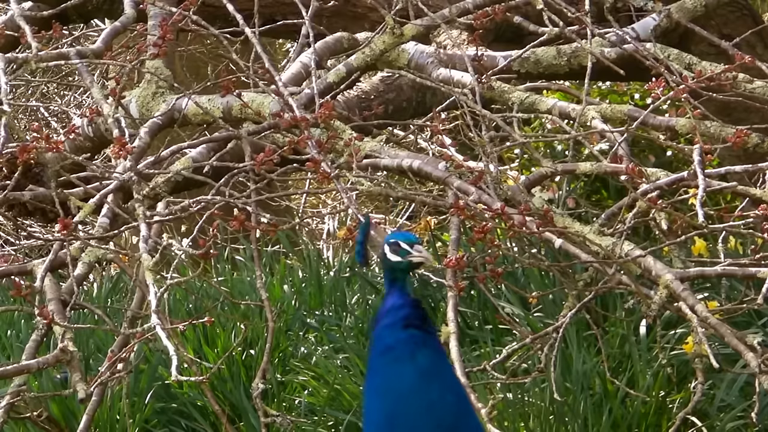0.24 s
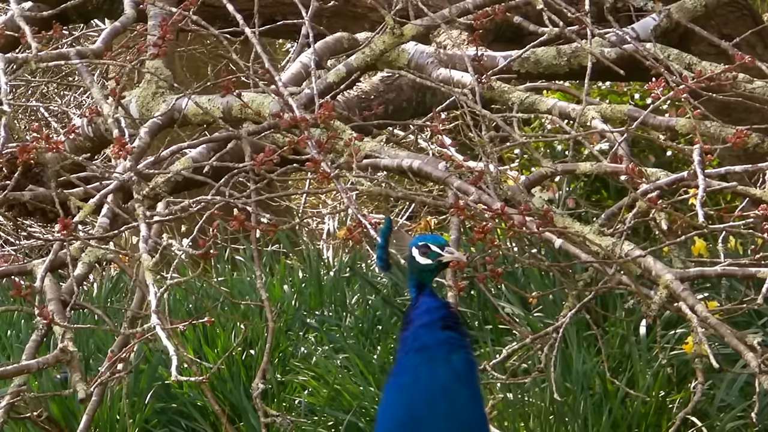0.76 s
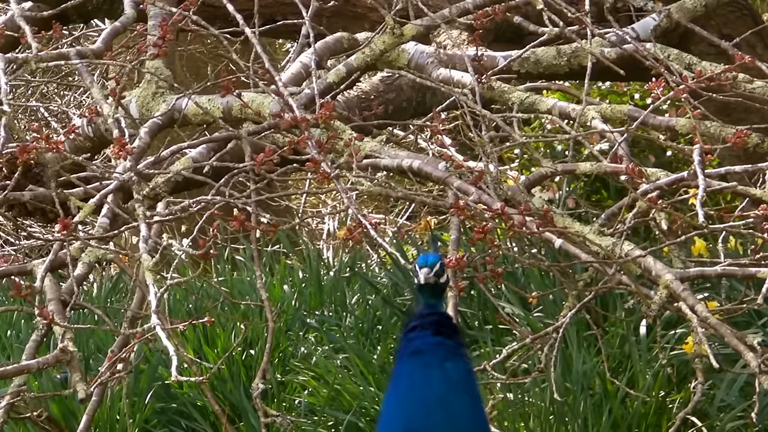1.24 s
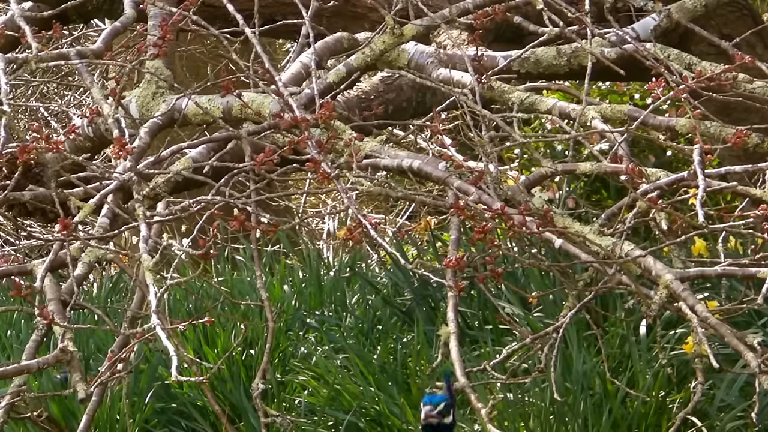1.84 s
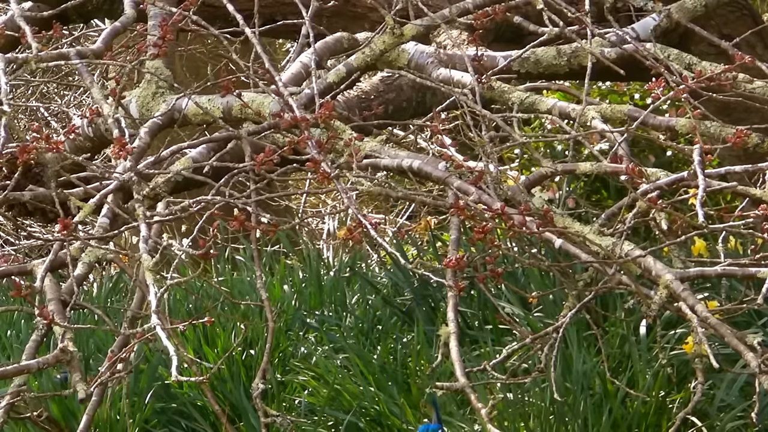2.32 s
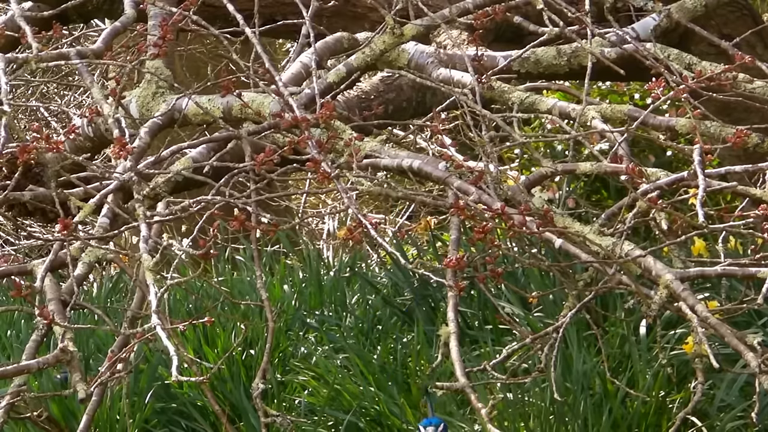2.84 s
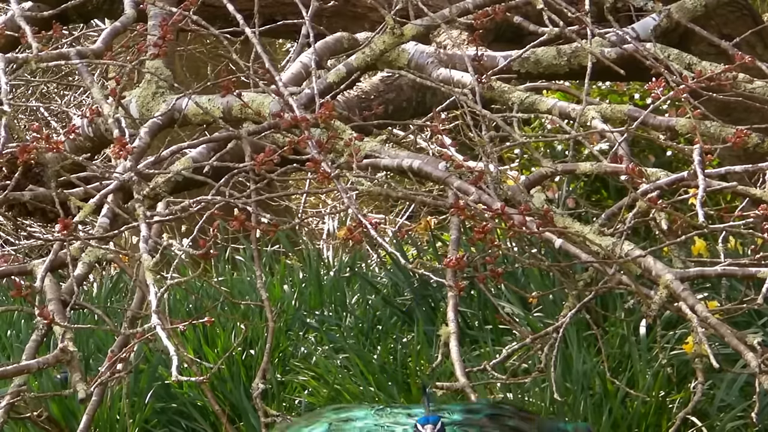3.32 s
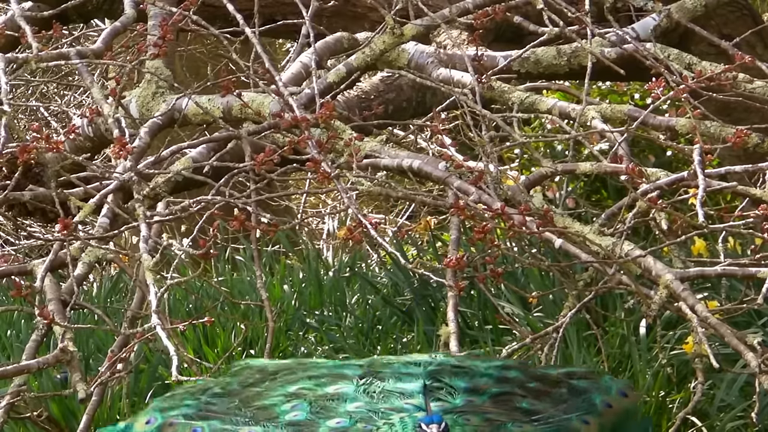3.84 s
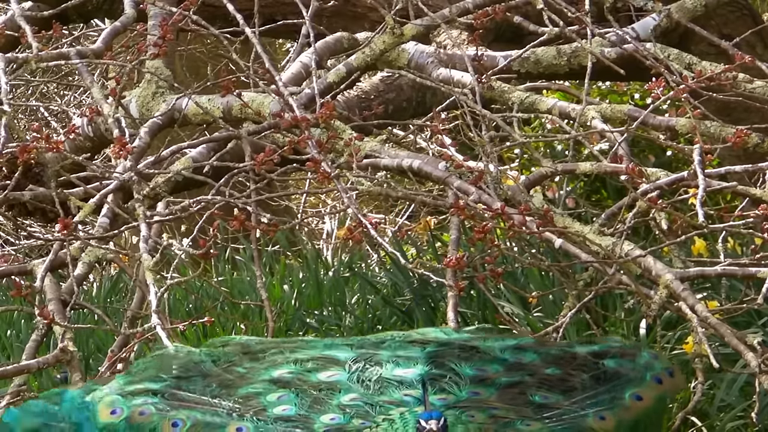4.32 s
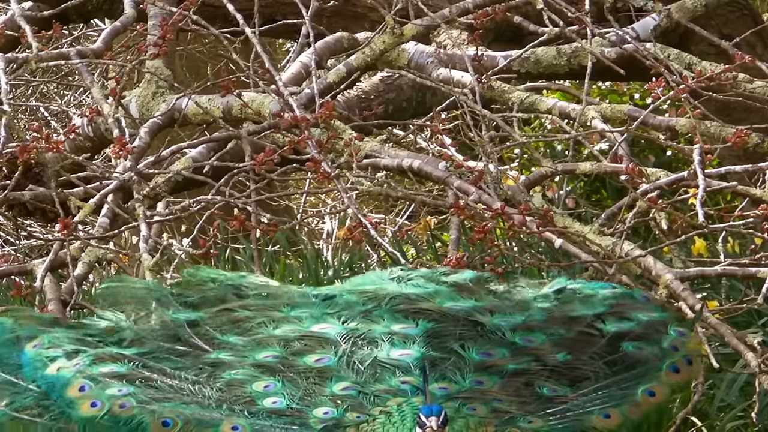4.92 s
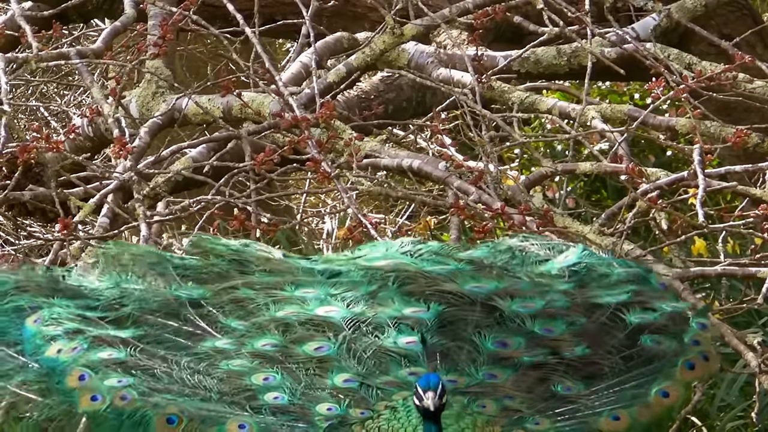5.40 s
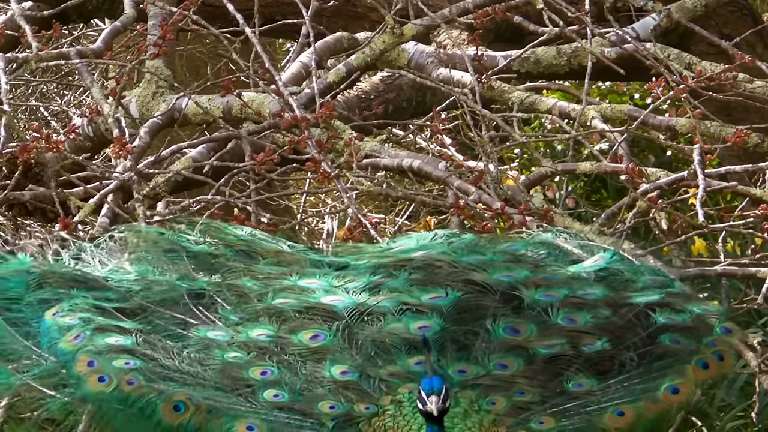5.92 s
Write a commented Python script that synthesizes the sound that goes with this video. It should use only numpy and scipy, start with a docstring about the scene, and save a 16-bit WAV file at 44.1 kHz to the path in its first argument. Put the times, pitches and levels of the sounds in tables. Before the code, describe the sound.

A peacock screams three times, loud and arching, over small bird whistles and a quiet outdoor hush, then softly rustles its tail feathers.

```python
"""In the hush at the edge of a wood, distant birds call, small birds whistle nearby and a foot falls.
A peacock then screams three times: each call starts with a rasp and arches up and down in pitch, as
his vibrating membranes sound through windpipe and beak and the trunks scatter the sound back.
An automatic gain control pushes the hush down under every scream. Last he raises his train, barbs
hissing and quills brushing, while far birds call again and another soft step crushes the grass."""
import sys
import numpy as np
from scipy import signal
from scipy.fft import rfft, irfft
from scipy.io import wavfile
from scipy.ndimage import uniform_filter1d

SR = 44100
rng = np.random.default_rng(int(sys.argv[2]) if len(sys.argv) > 2 else 0)


def int16_out(signal):
    """Quantize to a 16-bit WAV file."""
    q = np.round(np.clip(np.atleast_2d(signal).T, -1, 1) * 32767)
    wavfile.write(sys.argv[1], SR, q.astype(np.int16))


N = 271832
TIME, BINS = np.arange(N) / SR, np.fft.rfftfreq(N, 1 / SR)


# The screams. Each row: start and length in seconds, top pitch in Hz, climb and descent in seconds,
# descent rate in Hz per second, corner rounding, attack and release in seconds, effort in dB, brightness
# in dB per octave, beak opening as a factor on the throat's frequencies, gritty time in seconds.
SCREAMS = [(2.143, 0.71, 892.9, .163, .2223, 645, 0.022, .06, 0.026, 0.45, 0.5, 1.0395, .25),
           (3.095, 0.5394, 861, 0.13, 0.2, 763.6, 0.04, .019, 0.017, -3, 1.2, 1.01, 0.078),
           (3.891, 0.5825, 847.4, .101, .1944, 801, .0433, 0.017, 0.041, -2.5, 0.76, 0.9953, 0.096)]
def scream(length, top_hz, climb, descent, descent_rate, rounding, attack, release,
           effort_db, bright_db, beak, gritty):
    """Source and filter: a membrane drives the throat, and a slower one modulates it into a rasp."""
    t = np.arange(0, length, 1 / SR)
    hz = pitch_arch(t, length, top_hz, climb, descent, descent_rate, rounding)
    octaves = np.log2(hz / top_hz)  # effort and beak follow the pitch
    drive = amp(effort_db + effort(t, length, attack, release) + 23.5 * octaves)
    beak = beak - 0.046 * octaves
    onset = np.minimum(t / attack, 1)
    rasp, depth = roughness(t, length, attack, gritty)
    shake = depth * second_membrane(rasp)
    jitter = 0.002 * drift(50)[:len(t)] + (0.00073 + 0.034 * rasp) * drift(350)[:len(t)]
    phase = 2 * np.pi * np.cumsum(hz * (1 + jitter)) / SR + shake
    voice = harmonics(hz, phase, drive, beak, bright_db - 5 * (1 - onset)) * (1 + shake)
    noise = breath(phase, onset * drive * rasp) + low_rasp(drive, rasp + depth)
    return (voice + noise) * signal.windows.tukey(len(t), 0.012)


def pitch_arch(t, length, top_hz, climb, descent, descent_rate, rounding, climb_rate=1525, floor_hz=641):
    """Frequency glide: the fundamental climbs, holds and descends more slowly, with rounded corners."""
    left = length - t
    below_top = climb_rate * rounding * np.logaddexp(0, (climb - t) / rounding)
    below_top += descent_rate * rounding * np.logaddexp(0, (descent - left) / rounding)
    catch = 33.6 * np.exp(-t / 0.01466)  # the pitch snaps up as the voice catches
    collapse = 103.4 * np.exp(-left / 0.01466)  # and drops as the air runs out
    return np.maximum(top_hz - below_top - catch - collapse, floor_hz)


def effort(t, length, attack, release):
    """Envelope in dB: after the attack the first push of air is the hardest, easing until the release."""
    opening = np.maximum(1 - t / attack, 0)
    closing = np.maximum(1 - (length - t) / release, 0)
    return 8 * np.exp(-t / 0.24) - 42 * opening ** 1.4 - 13 * closing ** 2


def roughness(t, length, attack, gritty):
    """Irregular vibration: the voice starts harsh, stays gritty a while, clears and breaks at the end."""
    start = np.exp(-np.maximum(t - attack, 0) / 0.011)
    grit = (1 - np.tanh((t - gritty) / 0.017)) / 2
    end = np.exp(-((length - t) / 0.067) ** 2)
    rasp = amp(-12) * start + amp(-28) * grit + amp(-20) * end + amp(-52)
    depth_radians = 0.064 * start + 0.033 * grit + 0.008 * end + 0.001
    return rasp, depth_radians


def second_membrane(rasp, centre_hz=306.7):
    """A modulating oscillator: it loses its regularity as the rasp grows."""
    hz = centre_hz * (1 + (0.012 + 0.25 * rasp) * drift(97)[:len(rasp)])
    return np.sin(2 * np.pi * np.cumsum(hz) / SR)


def harmonics(hz, phase, drive, beak, bright_db):
    """Nonlinear growth: overtones gain on the fundamental with effort, so a weak voice is purer."""
    chance = drift(6.8)
    voice = drive ** 0.82 * throat(hz / beak) * np.cos(phase)
    for k in range(2, 25):
        # overtones swell and dip by chance, the high ones most
        swell_db = 2.5 * np.minimum(k * hz / 8660, 1) * np.roll(chance, k * N // 25)[:len(hz)]
        tilt_db = bright_db * np.log2(np.maximum(k * hz / 2500, 1))
        gain = drive * amp(tilt_db + swell_db) * throat(k * hz / beak)
        voice += gain * np.cos(k * phase + 2 * np.pi * rng.random())
    return np.sqrt(2) * voice


# Throat resonances, then antiresonances. Each row: frequency in Hz, width in Hz, gain in dB.
FORMANTS = [(660, 200, -14), (1488, 226, -11), (2209, 280, 3.5), (2601, 260, 2), (2746, 340, -2),
            (3163, 214, -8), (3745, 243, -13), (4390, 283, -10.5), (5052, 310, -14.5), (5603, 390, -18.5),
            (6080, 245, -18.5), (7480, 1240, -21.5), (8900, 260, -27.5), (10730, 1380, -26),
            (12500, 830, -27), (13840, 1240, -25.5)]
ANTIRESONANCES = [(2400, 60, -5), (2960, 127, -6), (3520, 80, -2.5), (4133, 134, -11.5), (7700, 40, -37.5)]
def throat(hz, leak_db=-50):
    """Resonance: windpipe and open beak reinforce some frequencies, and side cavities cancel others."""
    grid = np.arange(0, SR / 2, 10)
    power = sum(amp(db) ** 2 / (1 + (2 * (grid - f) / width) ** 2) ** 2 for f, width, db in FORMANTS)
    notch_db = sum(db / (1 + (2 * (grid - f) / width) ** 2) for f, width, db in ANTIRESONANCES)
    return np.interp(hz, grid, np.sqrt(power + amp(leak_db) ** 2) * amp(notch_db))


# Spectrum of escaping air. Each row: frequency in Hz, relative level in dB.
BREATH_SPECTRUM = [(200, -42), (700, 2.5), (1150, -34), (1600, 9), (2500, -23), (3300, -18), (4500, 8),
                   (6000, 3), (8000, 1), (9800, -5.5), (11500, -24), (15000, -38)]
def breath(phase, strength):
    """Amplitude-modulated noise: air escapes in one puff per cycle."""
    return amp(-2) * strength * (1 + np.cos(phase)) * shaped_noise(BREATH_SPECTRUM)[:len(phase)]


# Spectrum of the low rasp. Each row: frequency in Hz, relative level in dB.
LOW_RASP_SPECTRUM = [(20, -12), (90, 7.5), (230, -3), (320, 6.5), (420, 13.5), (560, -17.5), (1000, -10),
                     (1600, -35), (8000, -66)]
def low_rasp(drive, rough):
    """Enveloped noise: a low thump and rumble while the voice is rough."""
    return amp(-25) * drive ** 0.17 * rough * shaped_noise(LOW_RASP_SPECTRUM)[:len(drive)]


# Swishes of the train. Each row: middle and half length in seconds, relative level in dB.
SWISHES = [(4.815, 0.035, -56), (4.989, 0.037, -59), (5.405, .06, -66), (5.552, .02, -66),
           (5.672, 0.02, -60), (5.74, 0.031, -67), (5.875, 0.077, -60.5), (6.03, 0.053, -62.5),
           (6.13, 0.075, -62)]
# Spectra of barbs and of quills. Each row: frequency in Hz, relative level in dB.
BARB_SPECTRUM = [(300, -31), (1000, 4.5), (3000, 4.5), (6000, -2.5), (9000, 0), (11500, -11), (13200, -3),
                 (15500, -20)]
QUILL_SPECTRUM = [(100, -22), (450, -18), (750, 7.5), (1100, -11), (1600, -5), (2600, -16), (5000, -23.5),
                  (12000, -35)]
def train(fan_open_s=6.04):
    """Friction noise: barbs hiss in soft swishes, and quills brush hardest as the fan opens."""
    lift = sum(amp(db + 6) * np.exp(-((TIME - middle) / half) ** 2) for middle, half, db in SWISHES)
    late = TIME - fan_open_s
    brush = amp(-43 + np.minimum(71 * late, -63 * late))  # rise and fall in dB per second
    return lift * colour(snaps(5000), BARB_SPECTRUM) + brush * colour(snaps(1200), QUILL_SPECTRUM)


def snaps(per_s, spread_db=2.3):
    """Shot noise: tiny impulses of uneven size, about half their power common to both microphones."""
    impulses = (rng.random((3, N)) < per_s / SR) * rng.standard_normal((3, N))
    impulses *= amp(spread_db * np.minimum(rng.exponential(1, (3, N)), 4))
    return impulses[0] + 0.94 * impulses[1:]


# Whistles nearby. Each row: start and length in seconds, first and last pitch of the glide in Hz,
# relative level in dB, opening down-slur in Hz, fade in dB per note length.
WHISTLES = [(1.279, 0.15, 7520, 7380, -41.5, 1700, 18), (1.398, 0.21, 6920, 6740, -40, 2000, 19),
            (1.655, .21, 7890, 7300, -42, 1401, 7.5), (1.916, .06, 4820, 4520, -48, -2, 12),
            (1.923, 0.09, 3740, 3690, -27, 1100, 15), (2.019, 0.102, 3730, 3904, -28, 5.5, 34),
            (2.071, 0.092, 4940, 5470, -36.5, 7, 11)]
def near_birds(slur_s=0.009, rise_s=0.027):
    """Frequency modulation: each whistle swells as its slur settles, then glides on and fades."""
    out = np.zeros(N)
    for start, length, first_hz, last_hz, db, slur_hz, fade_db in WHISTLES:
        t = np.arange(0, length, 1 / SR)
        hz = first_hz + (last_hz - first_hz) * t / length + slur_hz * np.exp(-t / slur_s)
        swell_db = -12 * np.maximum(1 - t / rise_s, 0)
        decay_db = fade_db * np.maximum(t - rise_s, 0) / length
        add(out, start, tone(hz, db + swell_db - decay_db))
    return out


# Notes deep in the wood. Each row: start and length in seconds, first and last pitch in Hz,
# relative level in dB.
FAR_NOTES = [(.66, 0.019, 3820, 3730, -55), (.685, .06, 2940, 2830, -51.5), (.72, 0.038, 3500, 3420, -62),
             (.76, 0.029, 3184, 2720, -45.5), (0.782, 0.038, 2590, 2550, -49),
             (.83, 0.086, 2606, 2830, -54), (0.989, 0.19, 3360, 3463, -60), (1.05, 0.13, 2860, 2950, -60),
             (1.404, .036, 5600, 5350, -59.5), (1.42, 0.53, 4470, 4350, -70),
             (5.15, 0.122, 4710, 4620, -66), (5.198, 0.074, 3300, 3420, -64), (5.3, 0.035, 3650, 3510, -63),
             (5.73, 0.19, 1694, 1954, -57), (6.07, 0.084, 2294, 2105, -53)]
def far_birds():
    """Linear chirps: each note glides straight from one pitch to another."""
    out = np.zeros(N)
    for start, length, first_hz, last_hz, db in FAR_NOTES:
        add(out, start, tone(np.linspace(first_hz, last_hz, round(length * SR)), db))
    return out


def tone(hz, db, waver=0.004):
    """Frequency jitter: a nearly pure tone trembles slightly."""
    phase = 2 * np.pi * np.cumsum(hz * (1 + waver * drift(110)[:len(hz)])) / SR
    return np.sqrt(2) * amp(db) * np.sin(phase) * signal.windows.tukey(len(hz), 0.12)


# Footfalls. Each row: start in seconds, level in dB.
FOOTFALLS = [(1.324, -40.5), (5.744, -48)]
# Spectrum of crushed grass. Each row: frequency in Hz, relative level in dB.
GRASS_SPECTRUM = [(30, -24), (100, -7), (180, 9.5), (260, -27), (380, 11), (600, -7), (1200, -36),
                  (8000, -49)]
def footfalls(rise_s=0.013):
    """Damped impact: each step crushes the grass in a short, dull burst of noise."""
    ages = [(np.maximum(TIME - start, 0) / rise_s, db) for start, db in FOOTFALLS]
    return sum(amp(db) * age * np.exp(1 - age) for age, db in ages) * shaped_noise(GRASS_SPECTRUM)


# Echoes from the ground and the bird's body. Each row: delay in seconds, gain as a factor.
CLOSE_ECHOES = [(.001127, -0.24), (.001762, -0.12)]
def ground(x):
    """Comb filtering: close echoes interfere, so each overtone swells and dips as it glides."""
    echoes = sum(gain * np.exp(-2j * np.pi * BINS * delay) for delay, gain in CLOSE_ECHOES)
    return irfft(rfft(x) * (1 + echoes), N)


def boughs(x, echo_db, spread_s):
    """Early reflections: ground and nearby boughs send eight faint echoes to each microphone."""
    delays = np.round(SR * (0.003 + spread_s * rng.random((2, 8)))).astype(int)
    return amp(echo_db) * np.array([sum(np.pad(x, (d, 0))[:N] for d in side) for side in delays])


# Decay of the wood. Each row: frequency in Hz, time to fall 60 dB in seconds.
WOOD_DECAY = [(300, 1.6), (1500, 1.35), (2200, 1.16), (2600, 1.64), (3200, 0.95), (4500, 0.95),
              (8000, 1.38), (15000, 0.38)]
# Colour of its reverberation. Each row: frequency in Hz, gain in dB.
WOOD_SPECTRUM = [(300, -60), (800, 7), (1600, 4.5), (2250, -1.5), (2650, -7), (3300, 9.5), (5000, -1.5),
                 (7500, -7), (10000, -2.5), (14000, -9)]
def wood(x, build_s=0.0099, width=0.52):
    """Reverberation: scatter from many trunks builds up, then each band dies at its own rate."""
    taps = rng.choice([-1., 1.], (3, 2 * SR)) * (rng.random((3, 2 * SR)) < 3000 / SR)
    hz, t, bands = signal.stft(taps[0] + width * taps[1:], SR, nperseg=256)
    bands = bands * amp(-60 * t / read(WOOD_DECAY, hz)[:, None]) * (1 - np.exp(-t / build_s))
    norm = np.linalg.norm(signal.istft(bands, SR, nperseg=256)[1][0])
    tail = signal.istft(bands * amp(read(WOOD_SPECTRUM, hz))[:, None], SR, nperseg=256)[1] / norm
    return signal.fftconvolve(x[None], tail, axes=1)[:, :N]


# Spectrum of the outdoor murmur. Each row: frequency in Hz, relative spectral density in dB.
HUSH_SPECTRUM = [(15, -53), (25, -55), (92, -7.5), (274, -15.5), (433, -2), (573, -11), (819, -15),
                 (1000, -18.5), (1550, -20.5), (2000, -22), (2270, -22.5), (2510, -24), (3680, -25.5),
                 (4400, -27), (11000, -39), (13500, -64.5), (15000, -87.5), (22000, -120)]
# Its likeness at the two microphones. Each row: frequency in Hz, correlation (negatives count as zero).
HUSH_COHERENCE = [(60, 0.26), (150, 0.45), (380, 0.27), (950, 0.42), (2380, 0.36), (5980, -0.62),
                  (15000, 0.04)]
# Its balance. Each row: frequency in Hz, left minus right in dB.
HUSH_BALANCE = [(60, -1), (180, -5.5), (550, -3.5), (1650, -2), (4970, 1), (15000, 0)]
def hush(level_db=-46, patchy_db=1.88, swell_db=1.18):
    """Partial coherence: a distant murmur drifts in patches, partly different at each microphone."""
    frames, hz = N // 256 + 5, np.fft.rfftfreq(1024, 1 / SR)
    a, b, c, d, patches = rng.standard_normal((5, frames, len(hz)))
    patches = unit(uniform_filter1d(uniform_filter1d(patches, size=10, axis=0), size=8, axis=1))
    swell = np.interp(np.arange(frames), TIME * SR / 256, drift(6))[:, None]
    coherence = np.clip(read(HUSH_COHERENCE, hz), 0, 1)
    left = a + 1j * b
    right = coherence * left + np.sqrt(1 - coherence ** 2) * (c + 1j * d)
    balance_db = np.array([1, -1])[:, None, None] * read(HUSH_BALANCE, hz) / 2
    gain = amp(read(HUSH_SPECTRUM, hz) + balance_db + patchy_db * patches + swell_db * swell)
    bands = (np.array([left, right]) * gain).swapaxes(1, 2)
    return amp(level_db) * unit(signal.istft(bands, nperseg=1024, noverlap=768)[1][:, :N])


def microphones(x, skew_radians=0.19, lean_db=0.46):
    """Phase and level difference: the bass is centred, the treble slightly out of step and leftward."""
    treble = np.clip((BINS - 2500) / 5000, 0, 1)
    left = np.exp(1j * skew_radians * treble) * amp(lean_db * treble)
    return irfft(rfft(x) * np.array([left, 1 / left]), N)


def amp(db):
    """Decibels to amplitude ratio."""
    return 10 ** (np.asarray(db) / 20)


def unit(x):
    """Normalisation to an rms of one."""
    return x / np.sqrt(np.mean(x ** 2) + 1e-20)


def read(points, hz):
    """Interpolation on a log-frequency axis."""
    f, value = np.transpose(points)
    return np.interp(np.log(hz + 1), np.log(f + 1), value)


def add(mix, start_s, sound):
    """Superposition: a sound joins the mix at its start time."""
    part = mix[round(start_s * SR):][:len(sound)]
    part += sound[:len(part)]


def colour(x, spectrum):
    """Spectral shaping of a full-length signal, at an rms of one."""
    return unit(irfft(rfft(x) * amp(read(spectrum, BINS)), N))


def shaped_noise(spectrum):
    """Filtered white noise, at an rms of one."""
    return colour(rng.standard_normal(N), spectrum)


def drift(rate_hz):
    """Low-pass noise: a random wander with an rms of one."""
    return unit(irfft(rfft(rng.standard_normal(N)) / (1 + (BINS / rate_hz) ** 4), N))


def scene():
    """Superposition of direct and reflected sound: peacock in front, songbirds around, wood behind."""
    peacock = np.zeros(N)
    for start, *call in SCREAMS:
        add(peacock, start, scream(*call))
    near, far = near_birds(), far_birds()
    direct = microphones(ground(peacock) + amp(-4.5) * near + amp(-2.5) * far)
    early = boughs(peacock, echo_db=-30, spread_s=0.016) + boughs(near + far, echo_db=-15, spread_s=0.056)
    reverberation = wood(amp(-27) * peacock + amp(-11.5) * near + amp(-9) * far)
    return direct + early + reverberation + hush() + train() + footfalls()


def record(dry, knee_db=-22, slope=0.56, recover_db_per_s=80, edge_hz=15500):
    """Compression: the gain falls quickly on a scream and soon recovers; a low-pass limits the band."""
    power_db = 10 * np.log10(abs(uniform_filter1d((dry ** 2).mean(0), size=260)) + 1e-12)
    recovery = TIME * recover_db_per_s
    cut_db = np.maximum.accumulate(slope * np.maximum(power_db - knee_db, 0) + recovery) - recovery
    ducked = dry * amp(-uniform_filter1d(cut_db, size=130))
    low_pass = signal.firwin(301, edge_hz, window=("kaiser", 9), fs=SR)
    return signal.oaconvolve(ducked, low_pass[None], "same")


dry = scene()
out = record(dry)
int16_out(out)
```